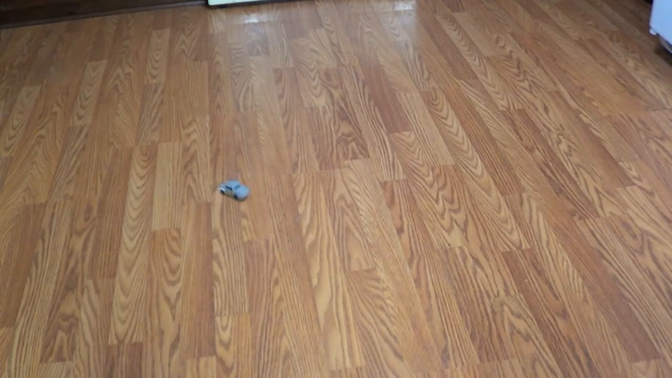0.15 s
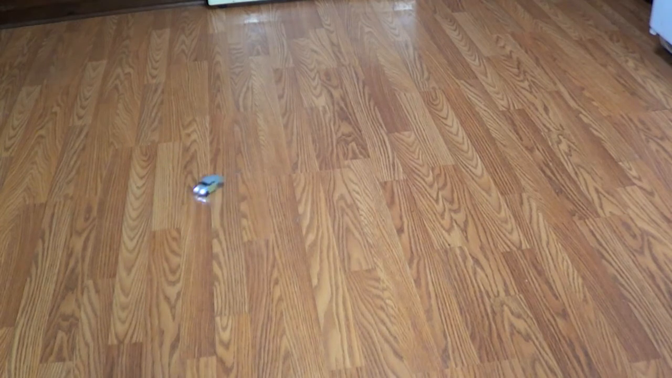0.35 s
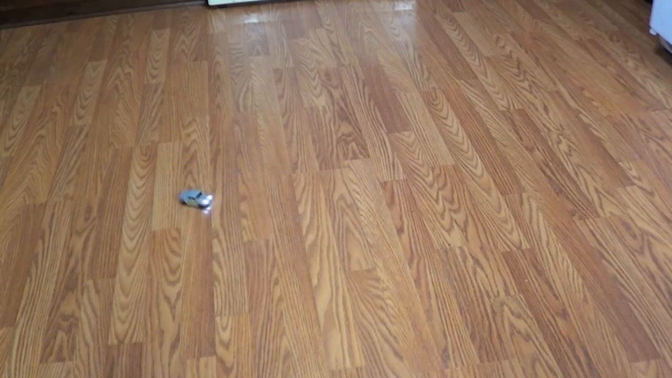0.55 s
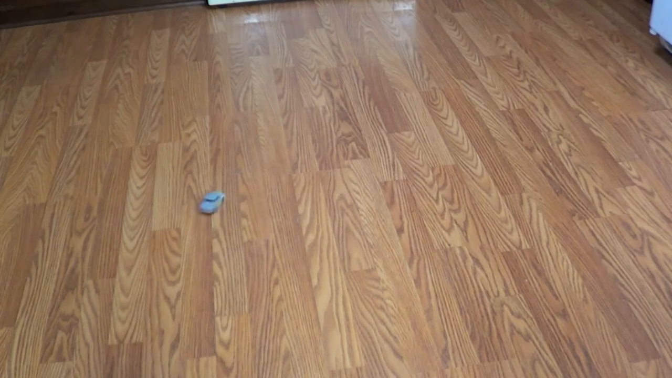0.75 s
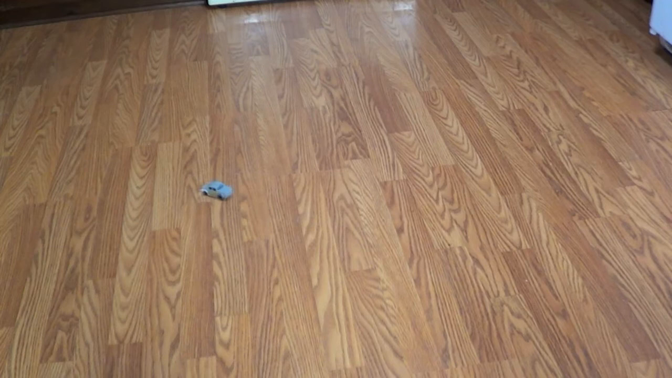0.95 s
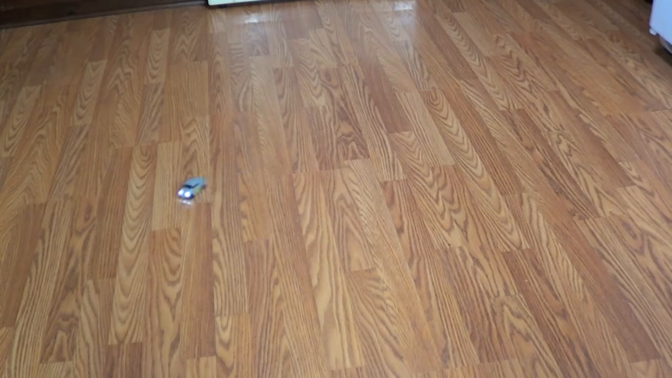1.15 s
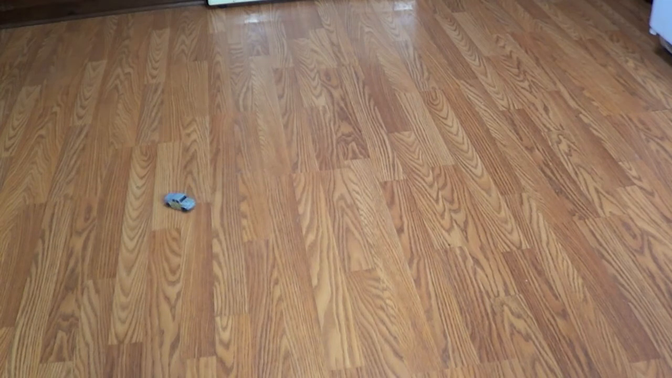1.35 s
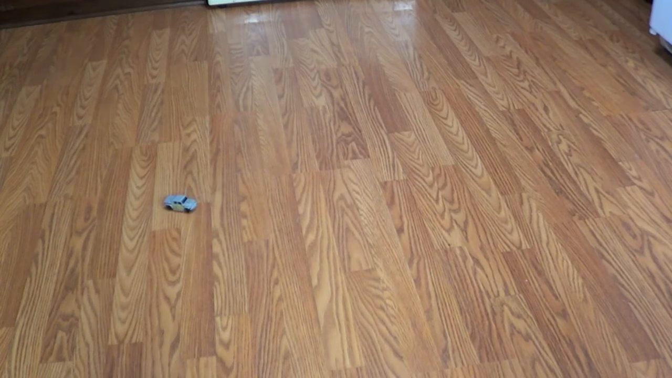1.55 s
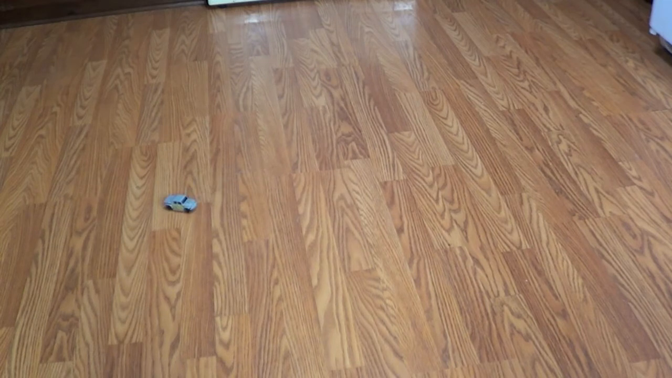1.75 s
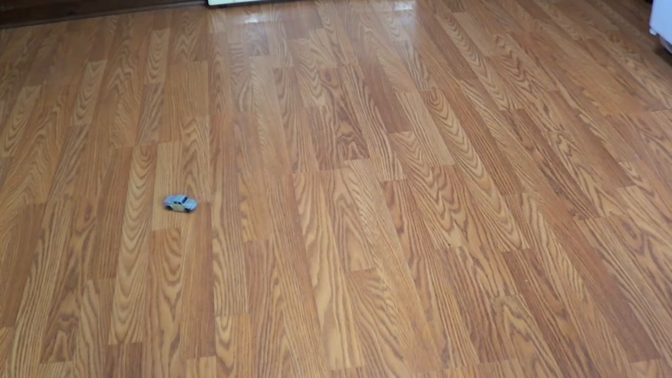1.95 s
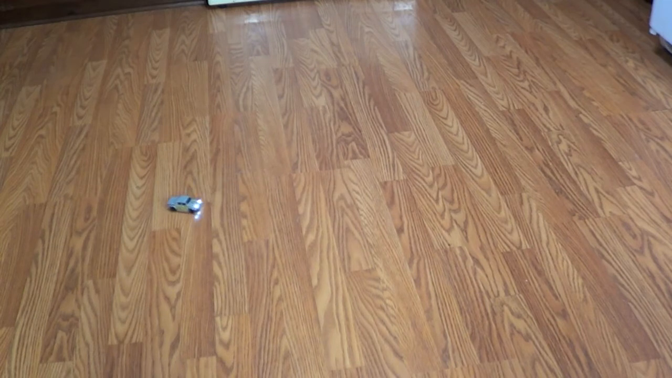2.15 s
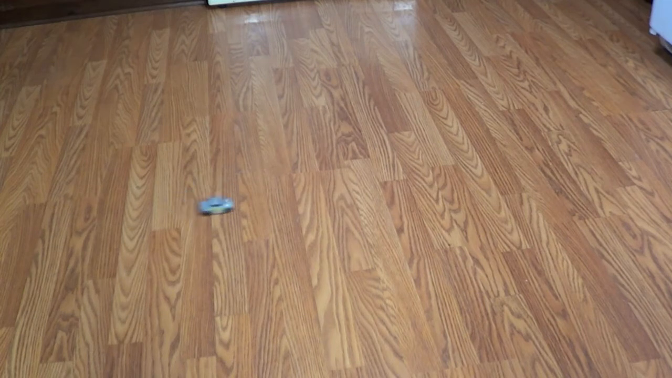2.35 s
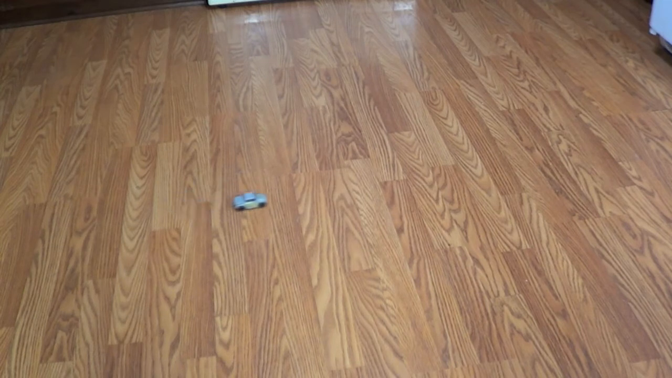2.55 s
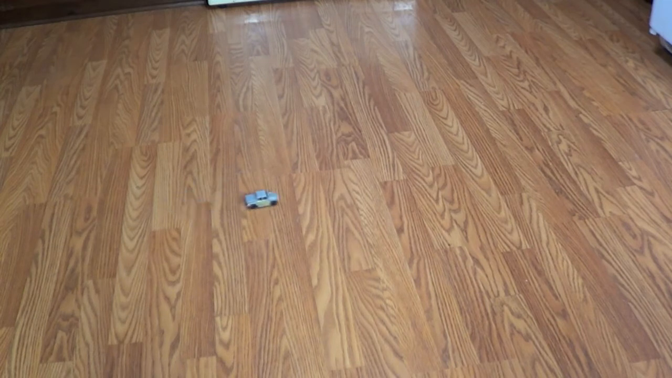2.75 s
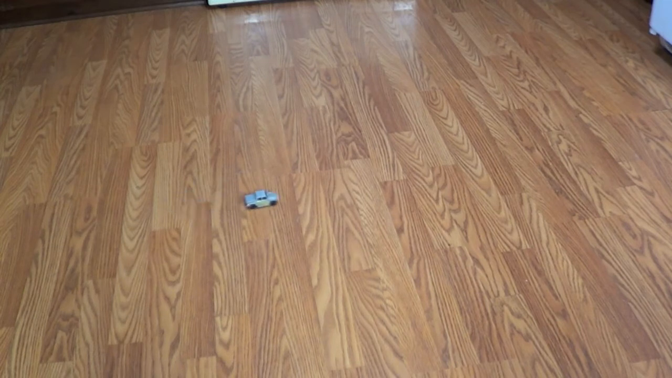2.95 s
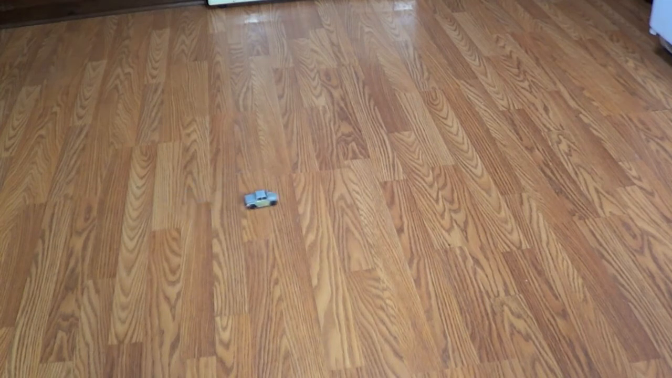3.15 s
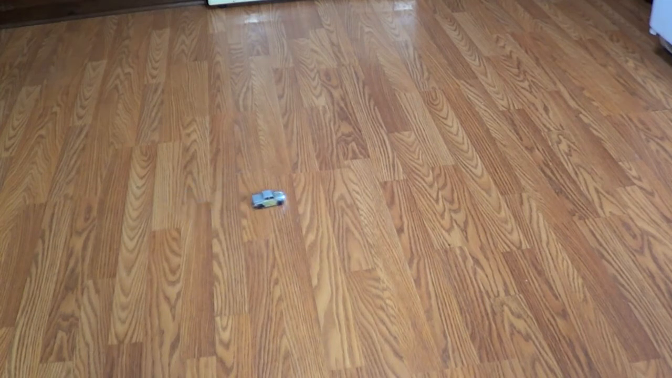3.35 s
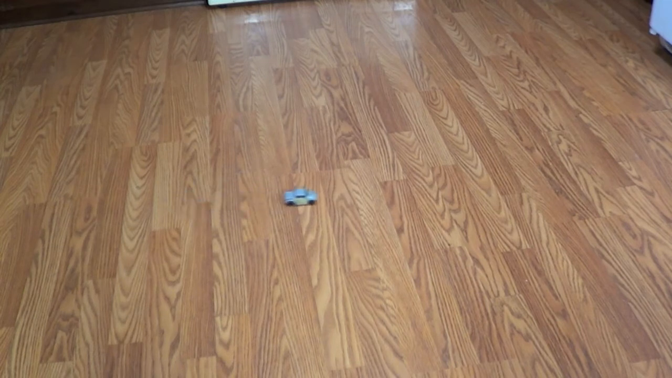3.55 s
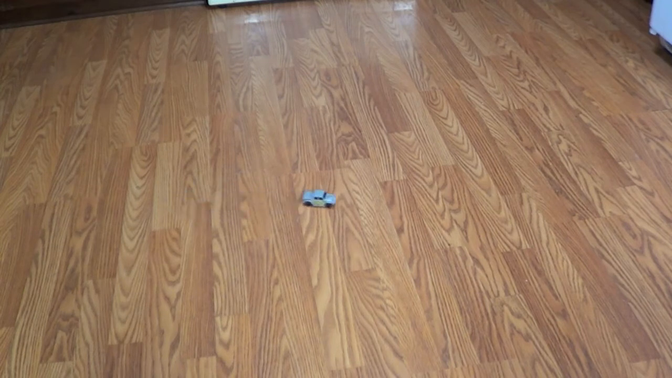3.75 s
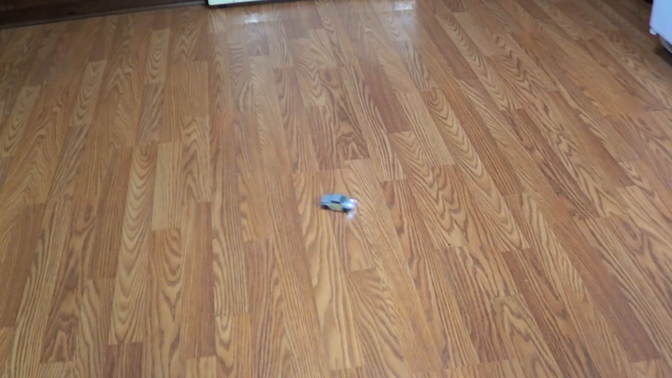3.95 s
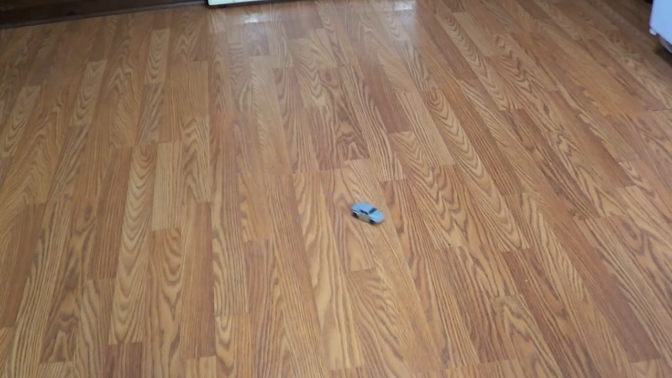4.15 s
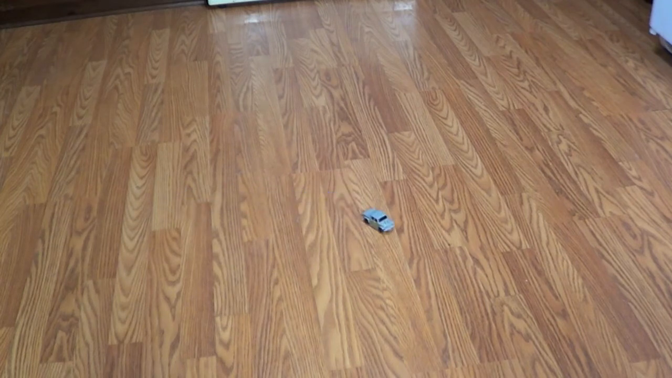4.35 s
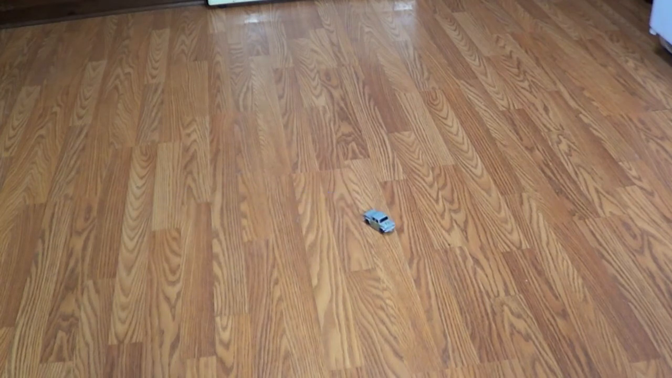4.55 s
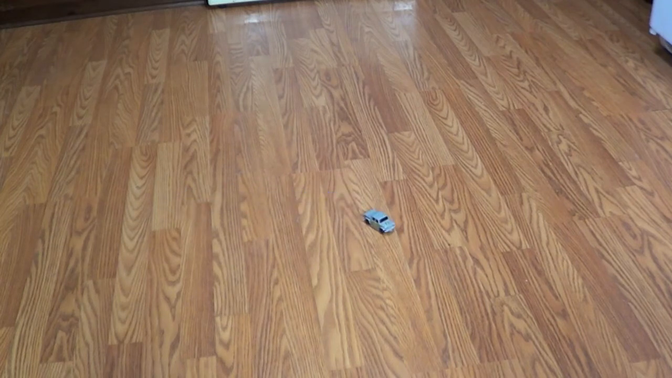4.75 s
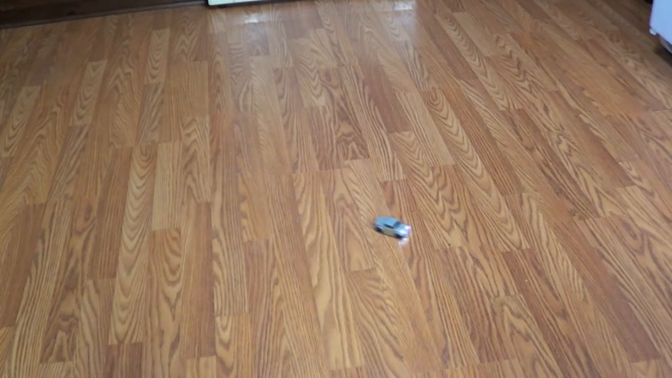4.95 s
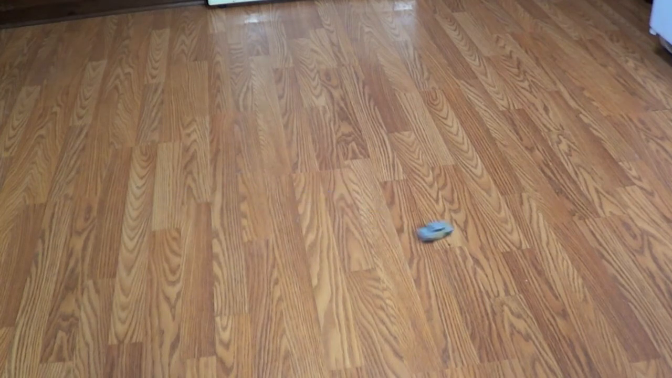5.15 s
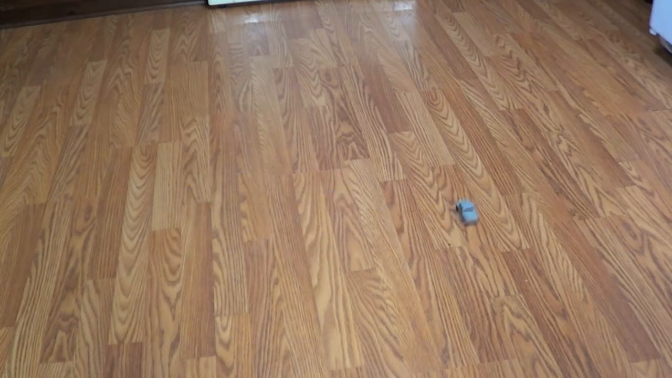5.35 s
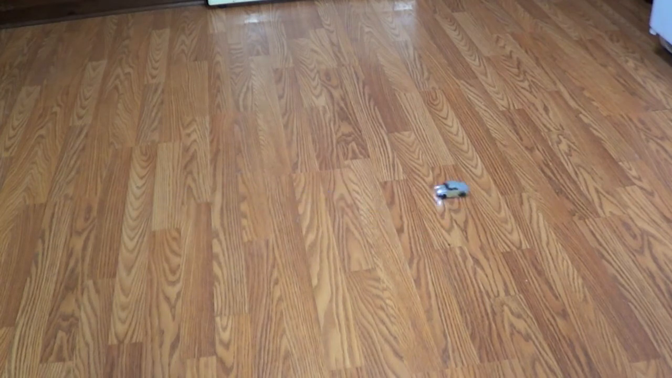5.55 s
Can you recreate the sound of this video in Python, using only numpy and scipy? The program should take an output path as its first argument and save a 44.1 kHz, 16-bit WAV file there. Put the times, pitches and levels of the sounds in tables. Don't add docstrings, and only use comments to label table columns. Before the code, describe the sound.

In a bare, slightly echoing room, a small toy truck is already whirring over a wooden floor, its loose plastic gears rattling brightly above a thin board drone. It coasts to a stop; hollow plastic button clicks close to the left trigger three short bursts with slack, ticking roll-outs, then a final long run. A faint appliance hum and microphone hiss sit underneath.

```python
import sys
import numpy as np
from scipy import signal
from scipy.fft import rfft, irfft, next_fast_len
from scipy.io import wavfile
from scipy.ndimage import uniform_filter1d, map_coordinates

SR = 44100
rng = np.random.default_rng(int(sys.argv[2]) if len(sys.argv) > 2 else 0)


def to_wav(sig):
    pcm = np.clip(np.atleast_2d(sig), -1, 1) * 32767
    pcm = np.round(pcm).astype(np.int16)
    wavfile.write(sys.argv[1], SR, pcm.T)


def gain_from_db(level_db):
    decades = np.asarray(level_db, float) / 20
    return 10 ** decades


N = 246519

# start in seconds, seconds the throttle # is
# held (for the rub, its length before it fades), rattle level in dB, spin-up time in seconds, coasting time #
# in seconds.
BURSTS = [
    (-.1, 1.432, -25.2, 0.017, .06),
    (2.108, .29, -23.5, .015, .41),
    (3.279, .228, -24.5, .04, .37),
    (3.837, .22, -22.8, 0.0058, .385),
    (4.414, .03, -46, 0.0018, .08),
    (4.833, .8, -22, .008, .1),
]


def unit(x):
    return x / np.sqrt(np.mean(x ** 2) + 1e-20)


def along(points, hz):
    f, v = np.transpose(points)
    return np.interp(np.log(hz + 1), np.log(f + 1), v)


def wobble(rate):
    knots = rng.standard_normal(int(N * rate / SR) + 4)
    return map_coordinates(knots, [np.arange(N) * rate / SR])


def filtered(x, response):
    m = 2 * next_fast_len(N // 2 + SR // 4)
    return irfft(rfft(x, m) * response(np.fft.rfftfreq(m, 1 / SR)), m)[..., :N]


def resonances(modes, f):
    total = 0
    for k, (center, width, db) in enumerate(modes):
        mode = 1j * f * width / (center * center - f * f + 1j * f * width)
        total = total + (-1) ** k * gain_from_db(db) * mode
    return total


def ring(modes, t, scatter_db, detune, scale=1):
    total = 0
    for hz, db, t60 in modes:
        fade = gain_from_db(db + rng.normal(0, scatter_db) - 60 * t / t60)
        total = total + fade * np.sin(2 * np.pi * scale * hz * rng.normal(1, detune) * t)
    return total


def room(x, wet_db, count=6):
    # frequency in Hz, time to fall 60 dB in seconds.
    decay = [(300, 0.29), (1500, 0.29), (5000, 0.35), (14000, 0.14)]
    # frequency in Hz, level against their sum in dB.
    apart = [(100, 1), (500, -13.5), (1000, -7.5), (2000, -9.5), (4000, -6.5), (8000, -3.5), (13000, -10.5)]
    hz, t, z = signal.stft(rng.standard_normal((count, 2, SR // 3)), SR, nperseg=256)
    z = z * gain_from_db(-60 * t / along(decay, hz)[:, None])
    z[:, 1] *= gain_from_db(along(apart, hz))[:, None]
    tails = signal.istft(z, SR, nperseg=256)[1]
    tails /= np.linalg.norm(tails[:, :1], axis=2, keepdims=True)
    spot = np.arange(N) / (SR // 8)
    gap = (spot - np.arange(count)[:, None] + count / 2) % count - count / 2
    parts = x * np.cos(np.clip(gap, -1, 1) * np.pi / 2)
    m = next_fast_len(N + SR // 2)
    mid, side = irfft(np.sum(rfft(parts, m)[:, None] * rfft(tails, m), axis=0), m)
    late = np.pad(np.array([mid + side, mid - side]), ((0, 0), (200, 0)))
    return gain_from_db(wet_db) * late[:, :N]


def appliance_hum():
    # frequency in Hz, rms level in dB.
    tones = [(240.1, -59.5), (959.7, -65), (1200, -80), (1680, -77.5), (2159, -75), (3844, -77),
             (11832, -73)]
    t, hum = np.arange(N) / SR, np.zeros(N)
    for hz, db in tones:
        level = np.sqrt(2) * gain_from_db(db + 0.17 * wobble(4.4))
        hum += level * np.sin(2 * np.pi * hz * t + 0.17 * wobble(4.6))
    return hum


def hiss():
    # frequency in Hz, level in dB per Hz.
    color = [(16, -41), (26, -22), (95, -16.5), (340, -14), (800, -19.5), (1350, -22), (2200, -22),
             (6400, -28.5), (11000, -31), (15500, -31)]
    # frequency in Hz, left-right likeness (1 = the same).
    alike = [(30, 0.9), (100, 0.82), (400, 0.092), (2000, 0.081), (12000, 0.95)]

    def spread(hz):
        angle = np.arccos(np.clip(along(alike, hz), -1, 1)) / 2
        return gain_from_db(along(color, hz)) * [np.cos(angle), np.sin(angle)]

    mid, side = filtered(rng.standard_normal((2, N)), spread)
    return gain_from_db(-54.5) * unit(np.array([mid + side, mid - side]))


def drive(t):
    # time in seconds, drone against rattle in dB.
    hollow = [(0, -14), (.3, -17.5), (1.3, -17), (2.2, -14), (3.5, -12.5), (4.1, -15), (4.38, -15),
              (4.43, -7), (4.83, -19), (5.0, -16), (5.59, -21.5)]
    unload_s, unload_db = 0.07, -11.5
    catch_s, catch_db = 0.06, 4
    lug_s, lug_db, free_db = 0.03, 5, -6
    rattle, drone, coasting = np.zeros((3, N))
    for start, held_s, db, spin_s, coast_s in BURSTS:
        age = np.clip(t - start, 0, None)
        free = np.clip(age - held_s, 0, None)
        slack = np.minimum(free / unload_s, 1)
        caught = np.clip((free - unload_s) / catch_s, 0, 1)
        speed = (t >= start) * np.clip(1 - free / coast_s, 0, 1)
        spin_up_db = -7.5 * np.exp(-age / spin_s)
        growth_db = 2.6 * (age - free)
        gain = speed ** 1.1 * gain_from_db(db + spin_up_db + growth_db + unload_db * slack + catch_db * caught)
        rattle += gain
        drone += gain * gain_from_db(lug_db * np.exp(-age / lug_s) + free_db * slack)
        coasting += gain * slack
    rattle = rattle * gain_from_db(0.3 * wobble(14))
    drone = drone * gain_from_db(np.interp(t, *np.transpose(hollow)) + 1.1 * wobble(12))
    return rattle, drone, coasting


def teeth(per_second, spread_db):
    strikes = rng.random(N) < per_second / SR
    sizes = gain_from_db(spread_db * np.minimum(rng.exponential(1, N), 4.2)) * rng.choice([-1, 1], N)
    clumps_db = 1.27 * wobble(320) + 0.54 * wobble(120) + 0.6 * wobble(30)
    return strikes * sizes * gain_from_db(clumps_db)


def causal(gain):
    cepstrum = irfft(np.log(gain + 1e-6))
    half = len(gain) - 1
    cepstrum[1:half] *= 2
    cepstrum[half + 1:] = 0
    return np.exp(rfft(cepstrum))


def shell(f):
    # frequency in Hz, width in Hz, level in dB.
    shell_modes = [(1570, 126, -27), (2344, 235, -5), (2652, 59, -6.5), (2872, 215, -4), (3228, 39, -7.5),
                   (4240, 147, -2.5), (4730, 330, -7), (5416, 520, -3), (5960, 370, -4.5), (7930, 300, -3),
                   (8490, 320, 0.5), (9410, 430, -0.5), (10330, 870, -8), (12370, 170, -5)]
    # frequency in Hz, level in dB per Hz.
    mesh = [(810, -37.5), (1250, -11), (2050, -16.5), (3900, -11.5), (7100, -6), (9600, -4.5), (12100, -10),
            (14500, -13), (15700, -18)]
    # frequency in Hz, width in Hz, level of the cut in dB.
    dips = [(1920, 160, -8.5), (3720, 140, -9.5), (6900, 330, -8.5)]
    power = gain_from_db(2 * along(mesh, f))
    for mode in shell_modes:
        power = power + abs(resonances([mode], f)) ** 3 * gain_from_db(-mode[2])
    floor = np.prod([abs(1 - resonances([dip], f)) for dip in dips], axis=0)
    return causal(np.sqrt(power) * floor)


def boards(impacts, drone):
    # frequency in Hz, width in Hz, level in dB.
    board_modes = [(569.5, 29, -2.5), (664, 66, 0.5), (848, 133, 0), (960, 167, -1.5), (1193, 166, -3.5),
                   (423, 110, -11.5)]

    def board(f):
        return resonances(board_modes, f) * f ** 2 / (f ** 2 + 400 ** 2)

    rolling = impacts + 0.63 * np.std(impacts) * rng.standard_normal(N)
    return gain_from_db(-2.0) * filtered(drone * rolling, board) / np.std(filtered(rolling, board))


def turning(x, patchy_db):
    z = signal.stft(x, nperseg=256)[2]
    across_pitch = uniform_filter1d(rng.standard_normal(z.shape), size=5, axis=0)
    field = uniform_filter1d(across_pitch, size=30, axis=1)
    return signal.istft(z * gain_from_db(patchy_db * unit(field)), nperseg=256)[1][:N]


def tooth_slaps(coasting):
    # time in seconds, peak in dB.
    hard = [(2.4254, -17), (2.5247, -21), (2.5397, -20), (3.2869, -26), (3.2924, -21), (3.3313, -19),
            (3.858, -13), (4.0914, -22), (4.228, -24), (4.2546, -22), (4.293, -29), (4.3316, -32),
            (4.371, -30), (4.4264, -33), (5.228, -12)]
    # frequency in Hz, level in dB, time to fall 60 dB in seconds.
    rim = [(5600, -14, .008), (8600, 0, .009), (9200, -1, .009)]
    take_up = [(start + 0.0035, db + 5) for start, _, db, *_ in BURSTS if start > 0]
    blows = [(round(s * SR), gain_from_db(db)) for s, db in hard + take_up]
    stray = np.flatnonzero((rng.random(N) < 25 / SR) & (coasting > 0))
    blows += [(k, gain_from_db(11) * coasting[k]) for k in stray]
    slaps, life = np.zeros(N), np.arange(SR // 50) / SR
    onset = 1 - np.exp(-life / 0.00081)
    for at, size in blows:
        blow = ring(rim, life, scatter_db=0.0, detune=0.039) * onset
        slaps[at:][:len(life)] += size * gain_from_db(3.0) * blow
    return slaps


def truck():
    # time in seconds, left over right in dB.
    place = [(0, .9), (1.2, 1.3), (2.2, .9), (3.4, .9), (4.2, .8), (4.9, 0), (5.59, -.2)]
    t = np.arange(N) / SR
    rattle, drone, coasting = drive(t)
    impacts = teeth(per_second=9000, spread_db=2.0)
    sound, steady = filtered(np.array([gain_from_db(-1.5) * rattle * impacts, impacts]), shell)
    sound /= np.std(steady)
    sound += boards(impacts, drone)
    sound = turning(sound, patchy_db=1.3)
    slaps = tooth_slaps(coasting)
    pan_db = np.interp(t, *np.transpose(place))
    echo = room(sound + 0.5 * slaps, wet_db=-4)
    return (sound + slaps + echo) * gain_from_db([pan_db / 2, -pan_db / 2])


def controller():
    # time in seconds, peak in dB, brightness in dB, case pitch in Hz.
    presses = [
        (2.0613, -19.5, -9, 1590),
        (2.606, -23, 2, 1700),
        (3.2274, -18, -9, 1613),
        (3.7775, -16.5, -4, 1746),
        (4.78, -19, -10, 1610),
    ]
    # time in seconds, peak in dB, brightness in dB, case pitch in Hz.
    light_clicks = [(2.0108, -44, -2, 1700), (2.6589, -38, -9, 1720), (2.814, -35.5, -5, 1650),
                    (2.8274, -45, -9, 1636), (3.1046, -37.5, -8.5, 1550), (3.156, -47, -11, 1660),
                    (3.486, -25.5, -11, 1590), (3.703, -42.5, -9, 1700), (3.731, -35, -6, 1640),
                    (3.752, -35, -12, 1640), (3.822, -43, -6, 1504), (4.0174, -25, -4.5, 1470),
                    (4.4152, -39, 7, 1710), (4.4264, -38, 4, 1590), (4.6992, -43, -4, 1390),
                    (4.7127, -30.5, -7, 1700), (4.7916, -27, -0.5, 1440)]
    # multiple of the case pitch, level in dB, time to fall 60 dB in seconds.
    case = [(.46, -8.5, 0.021), (.64, -8.5, 0.017), (.91, -5, .025), (1.0, 2.5, 0.021), (1.1, -21, 0.0065)]
    # frequency in Hz, level in dB, time to fall 60 dB in seconds.
    button = [(2390, -3, 0.017), (2940, -1.5, 0.018), (3610, -6, 0.0099), (4160, -9, 0.0086),
              (4900, -8, 0.0068), (5630, -9, 0.0068)]
    rebounds = [(s + 0.024, db - 18, -10, hz * 0.95) for s, db, _, hz in presses]
    out, t = np.zeros(N + SR), np.arange(SR // 8) / SR
    onset = 1 - np.exp(-t / 0.00068)
    grip_db = -6 * np.clip(t / 0.004 - 1, 0, 1)
    for s, db, bright_db, case_hz in presses + light_clicks + rebounds:
        burst = gain_from_db(-60 * t / 0.015) * rng.standard_normal(len(t))
        snap = 3.5 * signal.lfilter(*signal.butter(2, [1500, 5500], "band", fs=SR), burst)
        body = ring(case, t, scatter_db=1.5, detune=0.007, scale=case_hz)
        top = ring(button, t, scatter_db=1.5, detune=0.031) + snap
        click = body + gain_from_db(bright_db + 2.5) * top
        out[round(s * SR):][:len(t)] += gain_from_db(db - 4.0 + grip_db) * click * onset
    out = signal.lfilter(*signal.butter(2, 600, "high", fs=SR), out)
    left = out[:N] * gain_from_db(6.5)
    right = np.pad(out, (3, 0))[:N] * gain_from_db(-1.5)
    return np.array([left, right]) + room(out[:N], wet_db=-7.0)


def floor_knocks():
    # time in seconds, level in dB, frequency in Hz, time to fall 60 dB in seconds.
    thumps = [
        (4.293, -42, 236, .22),
        (4.296, -45, 318, 0.12),
        (4.297, -47, 440, .12),
        (4.377, -35, 694, 0.028),
        (4.381, -39, 1400, .02),
    ]
    t, knocks = np.arange(N) / SR, np.zeros(N)
    for s, db, hz, t60 in thumps:
        age = np.clip(t - s, 0, None)
        swell = 1 - np.exp(-age * hz / 1.4)
        tone = gain_from_db(db - 60 * age / t60) * np.sin(2 * np.pi * hz * age)
        knocks += tone * swell * (1 + 0.3 * wobble(90))
    return knocks


def scene():
    return appliance_hum() + hiss() + truck() + controller() + floor_knocks()


def low_pass(x):
    return signal.sosfilt(signal.butter(12, 16920, fs=SR, output="sos"), x)


def record(dry):
    limited = filtered(dry, lambda hz: np.where(hz < 15750, 1, gain_from_db(-39)))
    return low_pass(limited)


dry = scene()
out = record(dry)
to_wav(out)
```